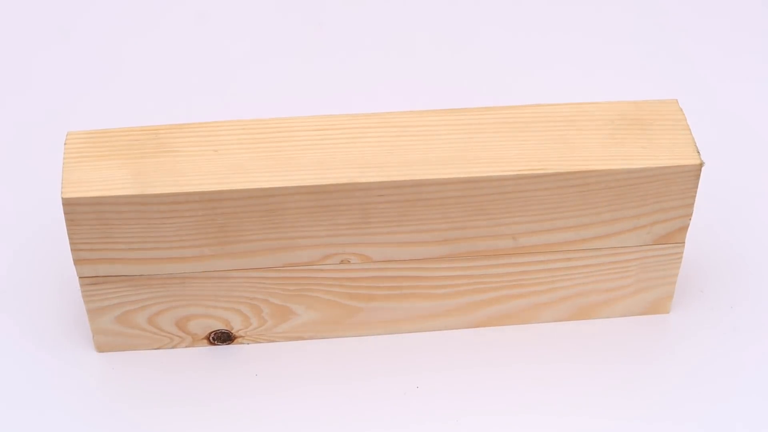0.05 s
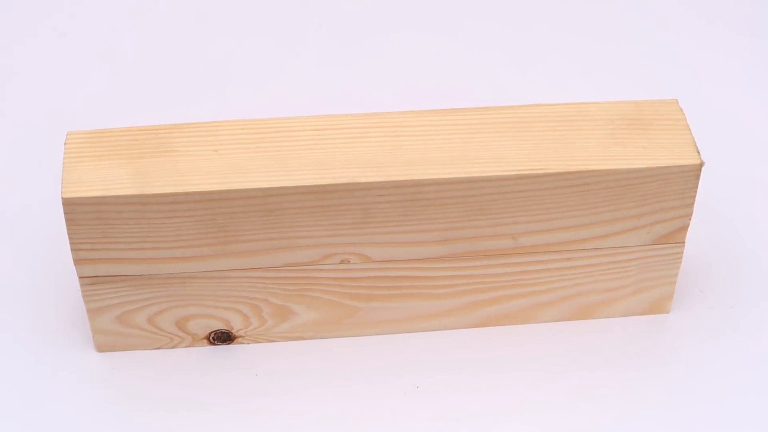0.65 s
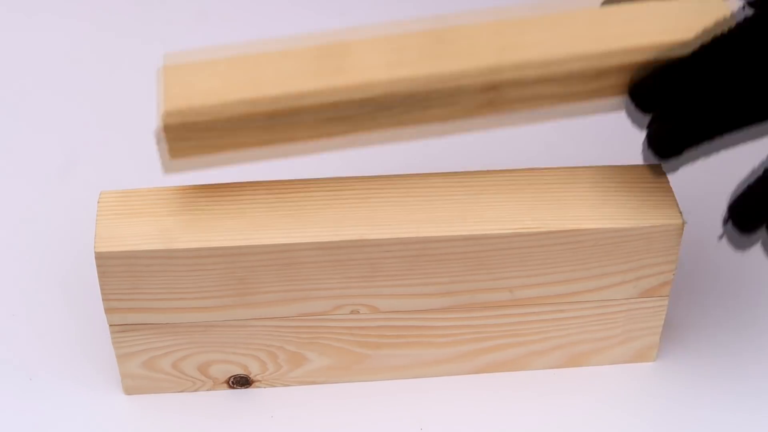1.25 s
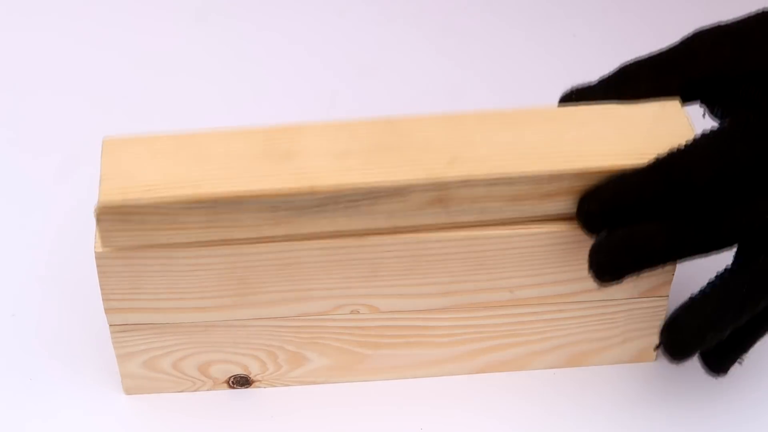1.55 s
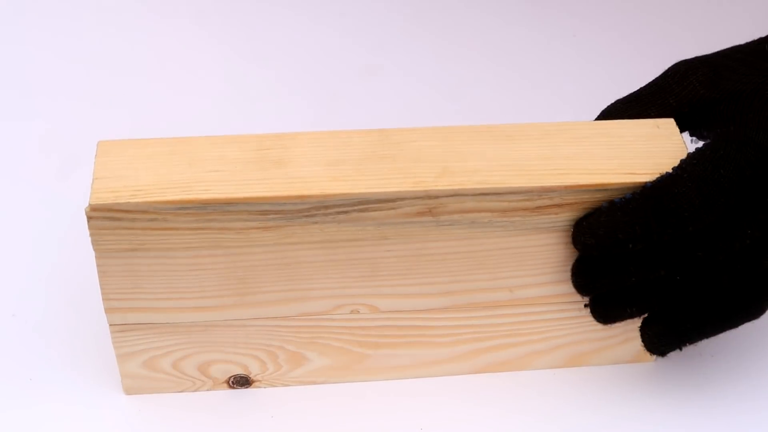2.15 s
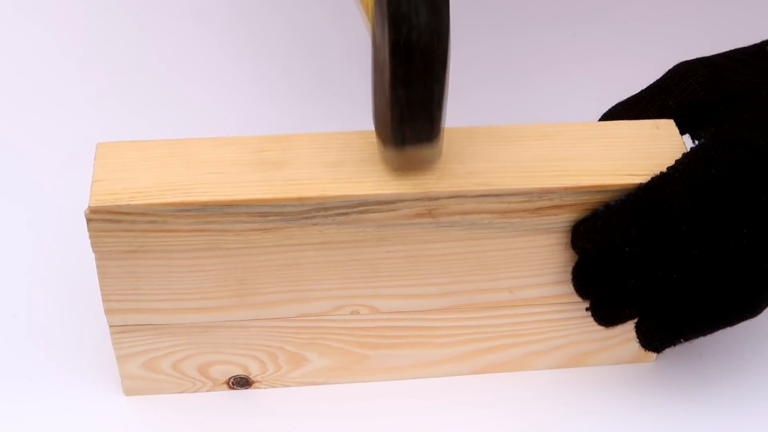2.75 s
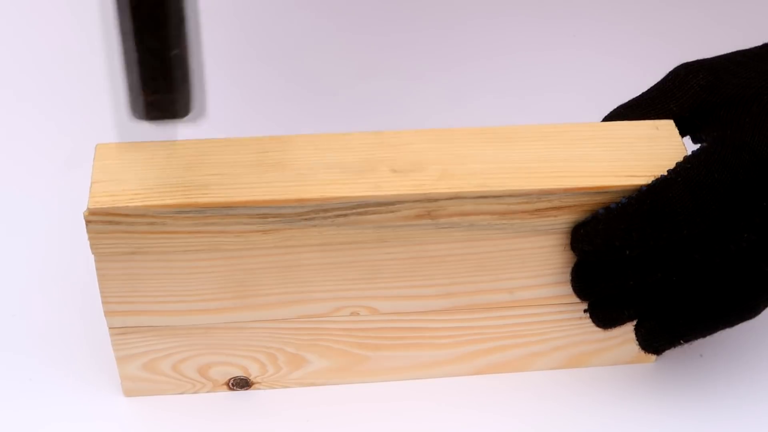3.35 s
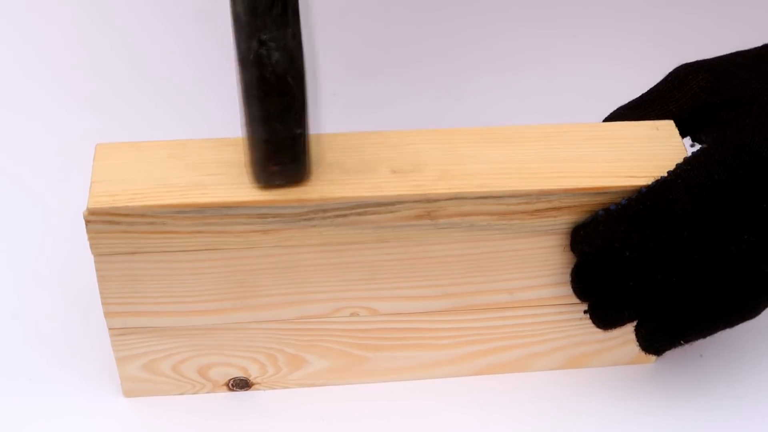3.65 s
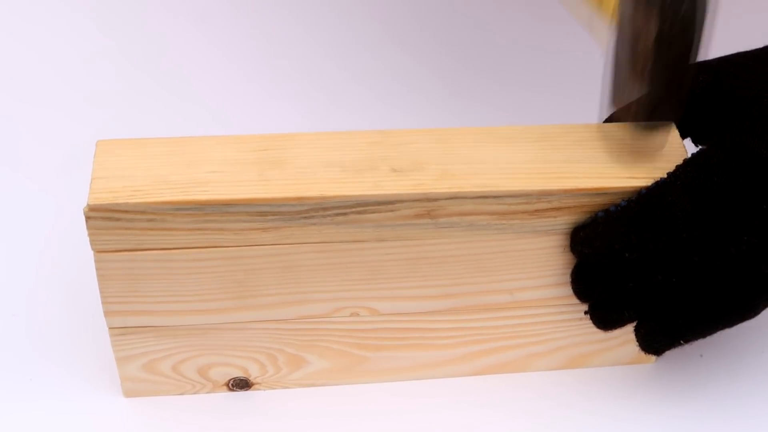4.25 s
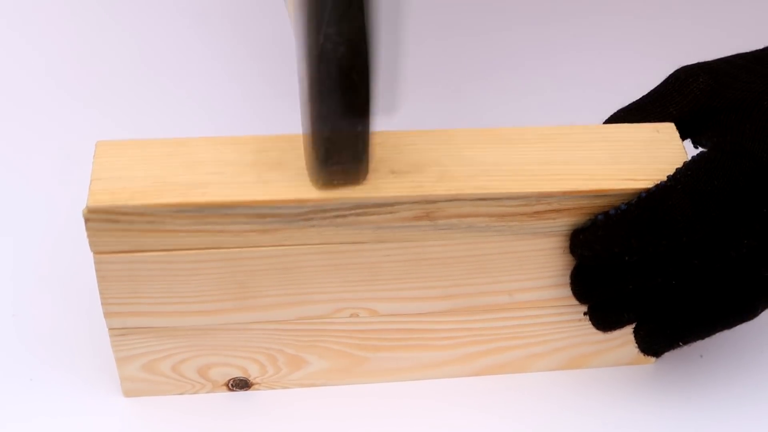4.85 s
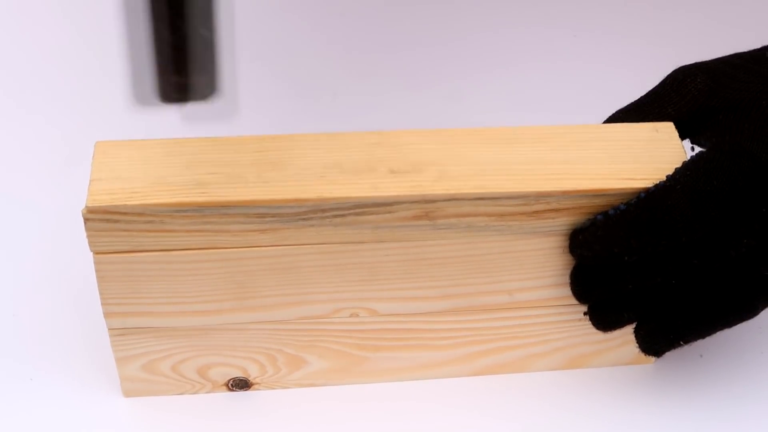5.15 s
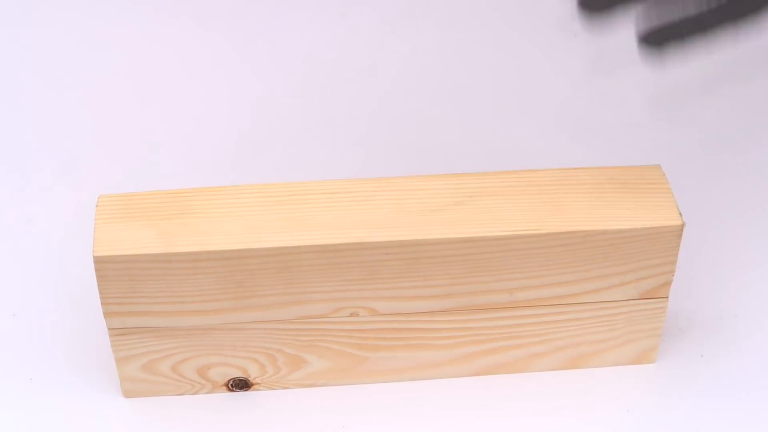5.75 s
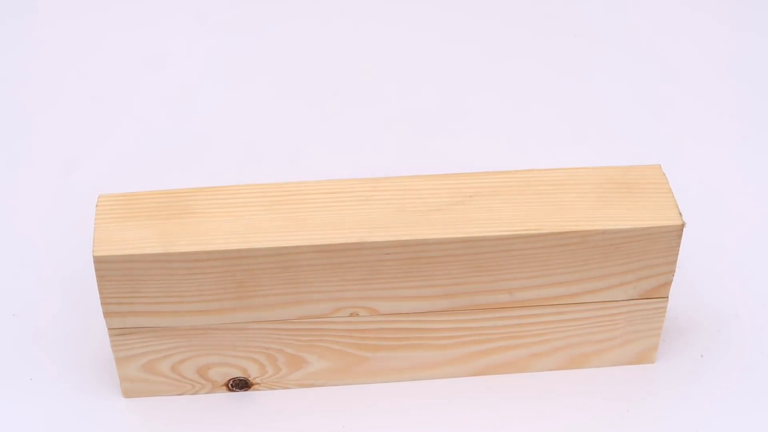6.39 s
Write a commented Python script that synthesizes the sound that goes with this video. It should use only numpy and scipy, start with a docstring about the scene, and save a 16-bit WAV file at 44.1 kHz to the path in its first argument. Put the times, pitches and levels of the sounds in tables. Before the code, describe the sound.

A faint outdoor hush lies behind a small room. For the first two seconds a small bird repeats a quiet two-note chirp some way off, with thin whistles between. Soft puffs of wind touch the microphone from about one second, with a stronger dull bump at 1.8 seconds. Around 2.2 seconds a wooden batten slides into line with a brief, soft hiss and a couple of tiny ticks. From 2.5 to 5.5 seconds a hammer taps along it seventeen times, close and loud, about five blows a second. Each knock has a sharp snap, a slight rattle and a short ring of wood and table that dies quickly. The tone shifts as the blows travel, brightest near 3.4 and 5.3 seconds. The background dips under the knocks and creeps back. From about six seconds, dull wind thumps and low rumble hit the microphone until the end, near 6.6 seconds.

```python
"""A small room, with an outdoor hush behind it, a small bird some way off and wind on the microphone.
Close by, a gloved hand slides a batten into line on a pine block; a hammer taps along it seventeen times.
Each knock rattles the batten, rings wood and table, and dies quickly in the room.
Every single knock is heard twice, 7.7 ms apart, which colours its tone.
The recorder's gain control ducks everything under the knocks and recovers afterwards."""
import sys
import numpy as np
from scipy import signal
from scipy.fft import rfft, irfft
from scipy.io import wavfile

SR = 44100
rng = np.random.default_rng(int(sys.argv[2]) if len(sys.argv) > 2 else 0)


def transcribe(u):
    """Save the signal u as a 16-bit wav file named by the first command-line argument.

    u: samples, shape (n,) or (channels, n), limited to [-1, 1]; the rate is SR.
    q: integer samples, one column per channel.
    """
    v = np.clip(np.atleast_2d(u).T, -1, 1)
    q = np.round(v * 32767).astype(np.int16)
    wavfile.write(sys.argv[1], SR, q)


N = 291926


def amp(db):
    """Decibels to gain."""
    return 10 ** (np.asarray(db) / 20)


def add(out, s, x):
    """Mix x into out from time s."""
    i = max(int(s * SR), 0)
    out[..., i:i + x.shape[-1]] += x[..., :out.shape[-1] - i]


def on_bins(points, size):
    """Rows of (f/Hz, value) interpolated onto the bins of a transform."""
    hz, value = np.transpose(points)
    return np.interp(np.log(np.fft.rfftfreq(size, 1 / SR) + 1), np.log(hz), value)


def noise(tone, size=N):
    """Noise of rms 1, coloured by rows of (f/Hz, level/dB)."""
    x = irfft(rfft(rng.standard_normal(size)) * amp(on_bins(tone, size)), size)
    return x / np.sqrt(np.mean(x ** 2))


def colour(x, tone):
    """Causal filter whose response follows rows of (f/Hz, level/dB)."""
    size = len(x)
    cepstrum = irfft(np.log(amp(on_bins(tone, size))), size)
    cepstrum[1:size // 2] *= 2
    cepstrum[size // 2 + 1:] = 0
    return irfft(rfft(x) * np.exp(rfft(cepstrum)), size)


def fade(t, t60):
    """Exponential decay, 60 dB down after t60 seconds."""
    return amp(-60 * t / t60)


def stereo(mid, side):
    """Left and right from mid and side."""
    return np.array([mid + side, mid - side])


def spell(s, length, db, attack_s, release_s):
    """Gain that rises up to time s, holds for a length and falls away."""
    t = np.arange(N) / SR
    rise, fall = 1 + (t - s) / attack_s, 1 - (t - s - length) / release_s
    return amp(db) * np.clip(np.minimum(rise, fall), 0, 1)


def outdoor_hush(base_db=-46.5, waver_db=-0.8):
    """Distant outdoor noise, wider in the treble; it wavers, grows duller and swells at the end."""
    # colour of the hush: f/Hz, level/dB
    tone = [(12, -51), (20, -3), (87, 6), (155, -2.5), (337, -4), (387, -7.5), (713, -7.5), (1730, -16),
            (1990, -17.5), (2410, -22), (4080, -28.5), (10500, -44), (13400, -49.5), (15000, -71.5)]
    # stereo width: f/Hz, side against mid/dB
    width = [(80, -25), (400, -9.5), (1500, -10.5), (4000, 0.5), (10000, 1)]
    # slow drift: t/s, level/dB, treble/dB
    drift = [(0, -4, 7.5), (1.5, -4, 5), (2.45, -3, 4.5), (2.8, -8.5, -3), (5.6, -1, -5.5), (6.62, 3, -7)]
    times, levels, trebles = np.transpose(drift)
    t = np.arange(N) / SR
    air = stereo(noise(tone), colour(noise(tone), width))
    low = signal.sosfilt(signal.butter(1, 2500, fs=SR, output="sos"), air)
    treble = amp(np.interp(t, times, trebles)) * (air - low)
    waver = noise([(1, -4.5), (8, -4), (25, -22.5), (100, -100)])
    return (low + treble) * amp(base_db + np.interp(t, times, levels) + waver_db * waver)


def bird_note(start_hz, end_hz, length_s, hoarse_hz, flutter_db=3, attack_s=0.0096):
    """One gliding note, hoarse from pitch jitter: it starts crisply, flutters and tapers off."""
    size = int(length_s * SR)
    t = np.arange(size) / SR
    jitter = noise([(30, -5.5), (250, 1.5), (700, -12), (2000, -70)], 16384)[:size]
    hz = np.linspace(start_hz, end_hz, size) + hoarse_hz * jitter
    flutter = amp(flutter_db * noise([(10, 8), (60, -19), (200, -51), (1000, -80)], SR)[:size])
    envelope = np.minimum(t / attack_s, 1) * np.cos(np.pi / 2 * t / length_s)
    return flutter * envelope * np.sin(2 * np.pi * np.cumsum(hz) / SR)


def bird(whistle_fall=0.0236, echo_t60=0.36, echo_db=-4, side_db=-2):
    """A small bird repeats a chip and a hoarse falling note, with whistles between, blurred by distance."""
    # two-note calls: t/s, level/dB
    calls = [(-.02, -55.5), (0.271, -50), (0.652, -51.5), (1.001, -50.5), (1.327, -48.5), (1.685, -50)]
    # thin whistles: t/s, length/s, f/Hz, level/dB
    whistles = [(.125, 0.06, 5384, -50), (0.108, 0.056, 4130, -59), (0.497, 0.2, 5280, -63.5),
                (.52, 0.21, 4135, -62), (0.882, 0.092, 5480, -67), (1.209, 0.086, 5260, -56.5),
                (1.558, 0.083, 5300, -57.5), (3.769, .05, 5480, -74.5), (4.115, .07, 5400, -69)]
    song = np.zeros(N)
    for s, db in calls:
        add(song, s, amp(db - 2) * bird_note(4260, 4070, length_s=0.0305, hoarse_hz=88))
        add(song, s + 0.019, amp(db) * bird_note(3460, 3200, length_s=0.1188, hoarse_hz=173))
    for s, length, hz, db in whistles:
        whistle = bird_note(hz, hz * (1 - whistle_fall), length, hoarse_hz=50, flutter_db=5.5)
        add(song, s, amp(db) * whistle)
    t = np.arange(SR // 2) / SR
    echo = rng.standard_normal((2, len(t))) * fade(t, echo_t60)
    echo *= amp(echo_db) / np.linalg.norm(echo[0])
    echo[0, 0] += 1  # the direct path, dead centre
    mid, side = signal.fftconvolve(song[None], echo, axes=1)[:, :N]
    return stereo(mid, amp(side_db) * side)


def background_dip(start_s=0.727, depth_db=-8.5, length_s=0.56):
    """Gain of the background: the level drops at once and creeps back."""
    age = np.arange(N) / SR - start_s
    return amp(depth_db * (age > 0) * np.clip(1 - age / length_s, 0, 1))


def puff(s, hz):
    """One smooth push of air, centred on time s."""
    u = np.minimum((np.pi * hz * (np.arange(N) / SR - s)) ** 2, 40)
    return (2 * u - 1) * np.exp(-u)


def wind_on_microphone(port_lag_s=0.00094, crest_db=-5.5, pan_db=-2.6, side_db=-6):
    """Dull puffs reach the microphone's two ports in turn, over spells of uneven rumble."""
    # puffs of wind: t/s, level/dB, f/Hz
    puffs = [(.933, -35.5, 46.5), (1.152, -32.5, 95), (1.277, -37, 66), (1.637, -36, 94), (1.764, -32, 118),
             (1.808, -16, 88), (6.074, -19.5, 152), (6.093, -15, 115.7), (6.192, -23.5, 120),
             (6.29, -27, 87), (6.548, -27, 152), (6.596, -29.5, 87)]
    # spells of rumble: t/s, length/s, level/dB
    spells = [(0.773, 0.25, -49.5), (1.134, 0.11, -49.5), (1.674, 0.13, -46.5), (6.02, 0.15, -34.5),
              (6.285, 0.33, -41.5)]
    # colour of the rumble: f/Hz, level/dB
    tone = [(20, -8), (60, 0), (140, -3.5), (210, -12.5), (320, -48), (600, -61), (2000, -86)]
    t = np.arange(N) / SR
    # each puff has a crest an octave sharper
    push = sum(amp(db) * (puff(s, hz) + amp(crest_db) * puff(s, 2 * hz)) for s, db, hz in puffs)
    ports = np.array([np.interp(t + lag, t, push) for lag in (port_lag_s / 2, -port_lag_s / 2)])
    level = sum(spell(s, length, db, attack_s=0.066, release_s=0.18) for s, length, db in spells)
    rumble = level * stereo(noise(tone), amp(side_db) * noise(tone))
    return ports * amp([[pan_db / 2], [-pan_db / 2]]) + rumble


def ticks(t60=0.014):
    """A few tiny dry ticks, dead centre."""
    # ticks: t/s, level/dB, f/Hz
    events = [(2.163, -37, 900), (2.388, -38.5, 3450), (5.198, -51, 4970), (5.732, -47, 3430),
              (6.106, -46, 3570)]
    out, t = np.zeros((2, N)), np.arange(1024) / SR
    for s, db, hz in events:
        tone = [(hz / 4, -15), (hz, 0), (hz * 3, -14), (16000, -32)]
        add(out, s, amp(db) / 2 * fade(t, t60) * noise(tone, len(t)))
    return out


def batten_slide(grain_db=1.5, side_db=-7):
    """Planed wood gives a brief, grainy hiss as it slides into line."""
    # colour of wood rubbing on wood: f/Hz, level/dB
    tone = [(150, -19.5), (600, 7.5), (1800, 5), (3500, -0.5), (7000, -9), (13000, -17), (16000, -38)]
    grain = amp(grain_db * noise([(5, -18), (90, -3), (400, -47.5), (2000, -94)]))
    hiss = stereo(noise(tone), amp(side_db) * noise(tone))
    return hiss * grain * spell(s=2.286, length=0.056, db=-51.5, attack_s=0.16, release_s=0.13)


def wood_ring(t, detune=0.004, scatter_db=1.4):
    """The stack rings; every landing point weights its modes anew, and the grip shifts them slightly."""
    # modes of batten, block and table: f/Hz, level/dB, t60/s
    modes = [(142.5, -39, 0.13), (169.7, -35, 0.053), (207, -34, 0.09), (324, -39.5, .075),
             (361.8, -40, 0.12), (423, -35, 0.026), (465, -36, 0.042), (660, -26.5, 0.019),
             (714, -46.5, 0.096), (896, -46.5, 0.044), (910, -29.5, 0.038), (1000, -37.5, .035),
             (1086, -39.5, 0.076), (1250, -33, 0.017), (1680, -52, 0.015)]
    hz, db, t60 = np.transpose(modes)[:, :, None]
    chance = rng.standard_normal((len(modes), 2))
    hz = hz * (1 + detune * chance[:, :1])
    db = db + scatter_db * chance[:, 1:]
    return np.sum(amp(db) * fade(t, t60) * np.sin(2 * np.pi * hz * t), axis=0)


def burst(tone, rise_ms, size):
    """Coloured noise that swells and dies, of energy 1."""
    age = np.arange(size) / SR * 1e3 / rise_ms
    x = noise(tone, size) * age * np.exp(-age)
    return x / np.linalg.norm(x)


def bend(x, lag_at_1khz_s=0.0013):
    """Bending waves in wood travel with the root of frequency: treble arrives first, the lows trail."""
    hz = np.fft.rfftfreq(len(x), 1 / SR)
    phase = 4 * np.pi * lag_at_1khz_s * np.sqrt(1000 * hz)
    return irfft(rfft(x) * np.exp(-1j * phase), len(x))


def strike(force, ring, tilt):
    """A contact force heard through the wood, coloured by where it lands."""
    # dry contact of steel on wood: f/Hz, level/dB
    contact = [(25, -29.5), (80, -8), (160, 18.5), (240, -1.5), (420, 10.5), (680, 8.5), (1000, -2.5),
               (2000, -6.5), (3200, -4), (3750, -18), (4500, -18.5), (6000, -26.5), (11000, -42),
               (15000, -42.5)]
    size = len(force)
    body = colour(force, contact) + signal.fftconvolve(force, ring)[:size]
    return colour(bend(body), tilt)[:size // 2]


def small_room(gap_s=0.00094, build_s=0.0012, size=16384):
    """Dense reflections off near walls; each band fades at its own rate and the treble is wider."""
    # reverberation bands: f/Hz, level/dB, t60/s
    bands = [(60.86, -9.5, 0.38), (174, -7, 0.19), (450, -0.5, 0.12), (930, -9.5, 0.13), (2000, -4.5, 0.12),
             (3800, -9, 0.13), (7400, -9, 0.083), (15000, -15.5, 0.034)]
    t, centres = np.arange(size) / SR, np.array(bands)[:, 0]
    white, tail = rfft(rng.standard_normal((2, size))), 0
    for share, (hz, db, t60) in zip(np.eye(len(bands)), bands):
        band = irfft(white * on_bins(np.c_[centres, share], size))
        envelope = fade(t, t60) * np.clip((t - gap_s) / build_s, 0, 1)
        mid, side = band * envelope / np.linalg.norm(envelope)
        tail = tail + amp(db) * stereo(mid, side * min(hz / 5000, 1))
    return tail


def short_repeat(x, copy_db, delay_s=0.00767):
    """A sound plus a slightly delayed copy of itself, which colours its tone."""
    out = x.copy()
    add(out, delay_s, amp(copy_db) * x)
    return out


def hammer(rattle_db=3, ring_db=-1, snap_ms=1.0, size=16384):
    """Each close blow is a push, a rattle of the loose batten and a pitched snap; the room answers."""
    # blows: t/s, level/dB, delayed copy against first/dB,
    # distance from the batten's fullest-sounding spot/0-1, snap f/Hz, snap against hit/dB
    blows = [(2.49,-19,30,.25,2830,-17.5), (2.6953,-10,28,0.3,2793,-10), (2.8916,-13.5,17.5,0.27,2900,-11),
             (3.076,-18.5,6.5,0.41,2700,-22.5), (3.2632,-18.5,12,0.81,4170,-18),
             (3.4485,-16,-1,0.79,4450,-17), (3.6516,-16.5,5,0.37,2800,-19.5), (3.842,-14,5,0.12,3010,-13),
             (4.0326,-14.5,5.5,0.09,2600,-18), (4.2271,-15,-3.5,0.37,3500,-13),
             (4.4014,-15,6.5,0.27,3560,-15), (4.5779,-16.5,8,0.18,2970,-15), (4.7441,-15.5,7,0.24,3130,-18),
             (4.908,-15,32,0.5,2730,-16.5), (5.0784,-15,17.5,0.64,2740,-18.5),
             (5.263,-15.5,8,0.99,4460,-14), (5.4322,-16.5,19.5,0.64,2360,-30)]
    # colour along the batten: f/Hz, level at the fullest spot/dB, added at the far end/dB
    landing = [(279, -3, 19), (721, 1, -1), (1500, -6.5, 20.5), (2960, -14.5, 23), (4624, -11, 24.5)]
    out, t, walls = np.zeros((2, N)), np.arange(size) / SR, small_room()
    push = signal.unit_impulse(size)
    # the room gathers the rattle from all directions, so it hears only an even lift of the treble
    spread = colour(push, [(200, 0.0023), (900, 4), (2200, 8)])
    for s, db, copy_db, away, snap_hz, snap_db in blows:
        ring = amp(ring_db) * wood_ring(t)
        tilt = [(hz, full + away * end) for hz, full, end in landing]
        rattle_ms = 1.6 + 2.2 * away  # longer when the batten is struck at its end
        rattle = burst([(200, -28.5), (900, -6), (2200, 1.5), (16000, 0)], rattle_ms / 2, size)
        hit = strike(push + amp(rattle_db) * rattle, ring, tilt)
        paths = (walls + np.sqrt(3) * small_room()) / 2  # reflections change in part as the hammer moves
        knock = signal.fftconvolve(strike(spread, ring, tilt)[None], paths, axes=1)
        snap_tone = np.c_[snap_hz * np.array([0.65, 0.92, 1.08, 1.4]), [-35, 0, 0, -35]]
        snap = amp(snap_db) * np.linalg.norm(hit) * burst(snap_tone, snap_ms, size // 2)
        add(knock, 0, hit + snap)  # these two reach the microphone dry
        knock = short_repeat(knock, copy_db)
        rms_100ms = np.sqrt(np.sum(knock ** 2) / 2 / (SR / 10))
        add(out, s, amp(db) * knock / rms_100ms)
    # so small a body radiates little deep bass; soft pine blunts the very top
    return signal.sosfilt(signal.butter(2, [80, 12200], "bandpass", fs=SR, output="sos"), out)


def gain_control(x, threshold_db=-20, attack_s=0.07, recover_db_per_s=9, block=64):
    """Peaks over the threshold turn the recorder's gain down; it creeps back up between them."""
    starts, step_s = np.arange(0, N, block), block / SR
    peaks = np.maximum.reduceat(np.abs(x).max(axis=0), starts)
    cut_db, cuts = 0, []
    for over_db in 20 * np.log10(peaks + 1e-9) - threshold_db:
        if over_db > cut_db:
            cut_db += (over_db - cut_db) * step_s / attack_s
        else:
            cut_db = max(cut_db - recover_db_per_s * step_s, 0)
        cuts.append(cut_db)
    return x * amp(-np.interp(np.arange(N), starts, cuts))


def scene():
    """Woodwork close by and wind on the microphone, hush and bird in the distance."""
    close = hammer() + wind_on_microphone() + batten_slide() + ticks()
    distant = outdoor_hush() + bird()
    return close + distant * background_dip()


def record(dry):
    """The recorder turns itself down under the knocks, flattens the hardest peaks and cuts the top."""
    ceiling, top_hz = 0.64, 15700
    ducked = gain_control(dry)
    limited = ducked / (1 + (ducked / ceiling) ** 4) ** (1 / 4)
    return signal.sosfilt(signal.ellip(8, 0.2, 70, top_hz, fs=SR, output="sos"), limited)


dry = scene()
out = record(dry)
transcribe(out)
```